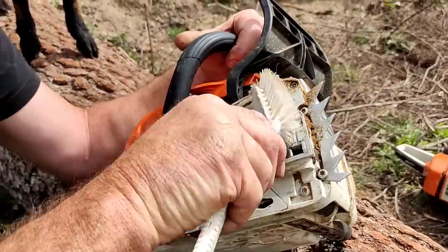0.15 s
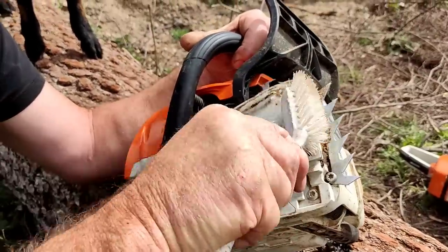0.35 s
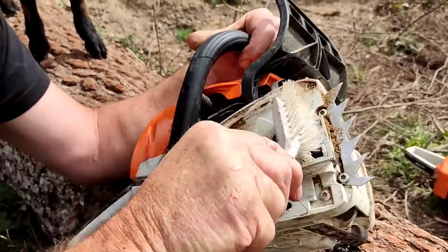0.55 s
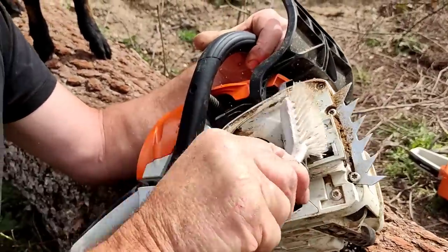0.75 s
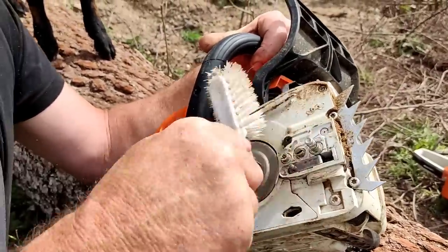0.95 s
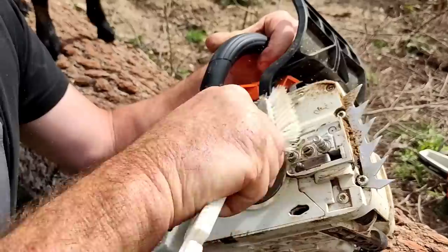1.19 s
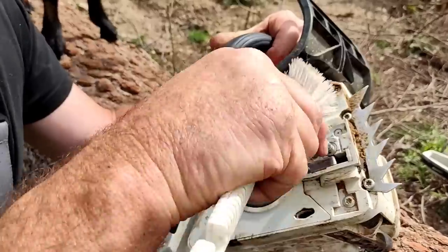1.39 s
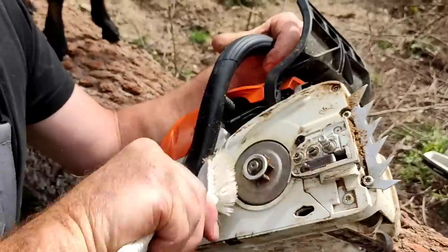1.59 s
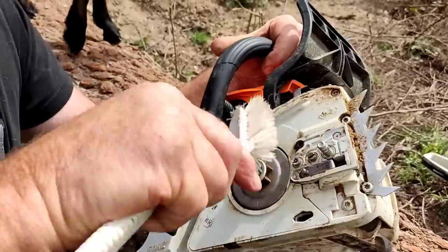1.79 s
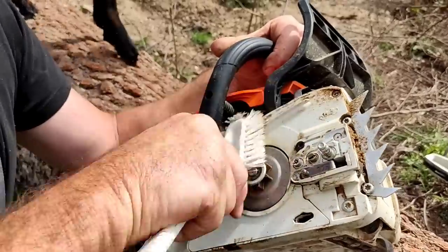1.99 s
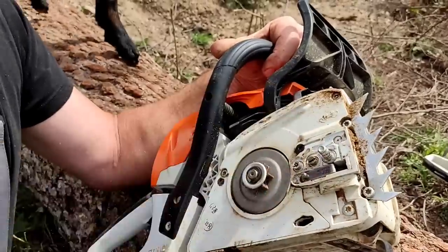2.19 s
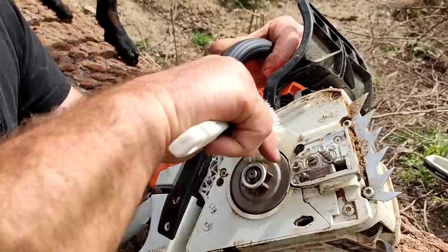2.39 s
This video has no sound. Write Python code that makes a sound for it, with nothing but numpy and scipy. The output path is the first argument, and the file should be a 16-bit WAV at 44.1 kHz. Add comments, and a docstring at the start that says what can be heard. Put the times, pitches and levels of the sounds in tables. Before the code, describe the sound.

Brisk scratchy brushing on a chainsaw: an early metallic tink, denser scrubbing towards one second, a sharp clack after a pause, then more separate strokes; recorded close in stereo outdoors with soft wind buffeting.

```python
"""Outdoors, close to a phone: a stiff brush scrubs a chainsaw.
Dense noisy ticks make the bristle hiss, coarser ticks the rumble of the hollow housing.
Noise bursts are the brush head's knocks; decaying sines are thuds and the ringing clutch drum.
Filtered noise buffets the two microphones as light wind; a faint wavering hum joins midway."""
import sys
import numpy as np
from scipy import signal
from scipy.fft import rfft, irfft
from scipy.io import wavfile
from scipy.ndimage import uniform_filter1d

SR = 44100
rng = np.random.default_rng(int(sys.argv[2]) if len(sys.argv) > 2 else 0)


def convert_level_to_amplitude(level_db):
    """Map a level in decibels to its linear amplitude factor."""
    exponent = np.asarray(level_db, float) / 20
    return 10 ** exponent


def transcribe(signal):
    """Save signal, clipped to [-1, 1], as a 16-bit WAV file at the path in sys.argv[1]."""
    frames = np.atleast_2d(signal).T
    limited = np.clip(frames, -1, 1)
    pcm = np.round(limited * 32767).astype(np.int16)
    wavfile.write(sys.argv[1], SR, pcm)


N = 108045


def curve(table, column):
    """One column of a time table, interpolated at every sample."""
    points = np.array(table, float)
    return np.interp(np.arange(N) / SR, points[:, 0], points[:, column])


def colour(x, table, unit=True):
    """Filter by (frequency [Hz], gain [dB]) points on a log frequency axis; rms 1 if unit."""
    points = np.array(table, float)
    hz = np.arange(N // 2 + 1) * SR / N + 1
    gain_db = np.interp(np.log(hz), np.log(points[:, 0]), points[:, 1])
    y = irfft(rfft(x) * convert_level_to_amplitude(gain_db), N)
    return y / np.sqrt(np.mean(y ** 2)) if unit else y


# stereo width: (frequency [Hz], side minus mid [dB])
WIDTH = [(60, 7), (110, -14), (200, -39), (380, -9.5), (700, -6), (1290, -6.5), (2380, -7), (4400, 1.5),
         (8120, 0), (15000, 2)]


def spread(mid, side):
    """Left and right from a mid and an unrelated side signal."""
    side = colour(side, WIDTH, unit=False)
    return np.array([mid + side, mid - side])


def pan(db):
    """Left and right gains, db apart."""
    return convert_level_to_amplitude(np.array([db, -db]) / 2)


# clutch drum mode frequencies [Hz]: RIM_MODES of the rim, one long-ringing, the rest hub and sprocket
DRUM_HZ = [1056, 2606, 2808, 5410, 8119, 11758, 4926, 7644, 8648, 9322, 10140, 11050, 12650]
# the same modes: (level [dB], t60 [s])
DRUM_MODES = [(-12, 0.29), (-36.5, 1.72), (-33, 2.3), (-18.5, 0.27), (-13, .55), (-11, 0.21), (-14.5, 0.71),
              (-11.5, 0.15), (-12, 0.2), (-18, 0.21), (-10, 0.1), (-8, 0.06), (-18, 0.077)]
# strikes: (time [s], rim [dB], hub [dB], favoured frequency [Hz], low modes [dB], long mode [dB],
# pan left minus right [dB]); negative time = already ringing
STRIKES = [(-.1, -25, -40, 4540, -30, -27, 0.5), (0.173, -44, -42, 10140, -60, -60, 15.5),
           (0.226, -16, -15.5, 12060, -25.5, -18.5, 5), (0.619, -10.5, -25.5, 10500, -13.5, -24.5, 0.5),
           (1.039, -46, -31.5, 8550, -28.5, -46, -12), (1.342, -39, -33.5, 8900, -33.5, -47, -12),
           (1.556, -50, -40, 10140, -50, -60, 13), (1.573, -22.5, -21.5, 8670, -18.5, -44, -7),
           (1.922, -36, -37, 7600, -48.5, -60, -8), (1.942, -20.5, -26.5, 10140, -32.5, -46, 1.5),
           (2.373, -38, -28, 10520, -31.5, -40.5, -0.5)]
RIM_MODES, LOW_BELOW_HZ, LONGEST_T60_S = 6, 1500, 1.4
FAVOUR_DB, FAVOUR_SIGMA_OCT = 14, 0.082
DRUM_LAG_RAD, DRUM_RISE_CYCLES = 1.675, 5


def strike_gain_db(strike, mode, hz, t60_s):
    """A strike drives each mode group at its own level, most the modes its spot favours."""
    time_s, rim_db, hub_db, spot_hz, low_db, long_db, _ = strike
    if hz < LOW_BELOW_HZ:
        gain_db = low_db
    elif mode < RIM_MODES:
        gain_db = rim_db
    else:
        gain_db = long_db if mode == RIM_MODES else hub_db
    gain_db += FAVOUR_DB * np.exp(-0.5 * (np.log2(hz / spot_hz) / FAVOUR_SIGMA_OCT) ** 2)
    return gain_db + 60 * min(time_s, 0) / t60_s  # decay before the start


def drum():
    """Strikes push damped complex resonators, one per mode of the steel drum."""
    out = np.zeros((2, N))
    phases = rng.random((len(STRIKES), len(DRUM_MODES)))
    for mode, (hz, (mode_db, t60_s)) in enumerate(zip(DRUM_HZ, DRUM_MODES)):
        t60_s = min(t60_s, LONGEST_T60_S)
        push = np.zeros((2, N), complex)
        for strike, phase in zip(STRIKES, phases[:, mode]):
            gain = convert_level_to_amplitude(strike_gain_db(strike, mode, hz, t60_s)) * pan(strike[-1])
            push[:, int(max(strike[0], 0) * SR)] += gain * np.exp(2j * np.pi * phase)
        turn = np.exp(2j * np.pi * hz / SR)
        decay = np.exp(-np.log(1000) / (t60_s * SR))
        ring = signal.lfilter([convert_level_to_amplitude(mode_db)], [1, -decay * turn], push)
        keep = np.exp(-hz / (DRUM_RISE_CYCLES * SR))  # swell over a few cycles
        ring = signal.lfilter([1 - keep], [1, -keep * turn], ring)
        lag_rad = DRUM_LAG_RAD * np.array([[0], [min(hz / LOW_BELOW_HZ, 1)]])  # right against left
        out += np.imag(ring * np.exp(1j * lag_rad))
    return out


LOUDEST_GRAIN_SPREADS = 3.38


def grains(rate_per_s, spread_db, tail_s):
    """Two trains of random ticks with common times and sizes, each tick a short noisy tail."""
    loudness = np.minimum(rng.exponential(size=N), LOUDEST_GRAIN_SPREADS)
    size = (rng.random(N) < rate_per_s / SR) * convert_level_to_amplitude(spread_db * loudness)
    power = signal.lfilter([1], [1, -np.exp(-2 / (tail_s * SR))], size ** 2)
    return np.sqrt(power) * rng.standard_normal((2, N))


PATCHY_DB, PATCHES_PER_S = 5, 30  # dB per unit of the smoothed random walk


def patchy(x, lo_hz, hi_hz):
    """Third-octave bands flicker separately as different bristles catch; end bands take the rest."""
    third_octave = 3 * np.log2(np.arange(N // 2 + 1) * SR / N + 1)
    first, last = int(3 * np.log2(lo_hz)), int(3 * np.log2(hi_hz))
    hold = int(SR / PATCHES_PER_S)
    spectrum, out = rfft(x), 0
    for centre in range(first, last + 1):
        steps = np.repeat(rng.standard_normal(size=400), hold)
        walk = uniform_filter1d(np.resize(steps, N), hold)
        weight = np.maximum(1 - abs(np.clip(third_octave, first, last) - centre), 0)
        out = out + convert_level_to_amplitude(PATCHY_DB * walk) * irfft(spectrum * weight, N)
    return out


# scrubbing strokes: (time [s], bristle hiss [dB], housing [dB])
SCRUB = [(0, -59.5, -33.5), (0.04, -69, -53.5), (0.1, -62, -56), (0.135, -57, -66), (0.215, -60, -61.5),
         (0.24, -36.5, -42.5), (0.3, -53.5, -64), (0.34, -40, -45), (0.38, -38, -51), (0.4, -48, -49),
         (0.44, -40, -45.5), (0.472, -45.5, -63), (0.5, -46, -40), (0.55, -36, -54.5), (0.575, -41, -60),
         (0.595, -53.5, -59.5), (0.63, -34, -47.5), (0.675, -48.5, -59), (0.72, -33.5, -43),
         (0.75, -27.5, -43.5), (0.775, -45.5, -53.5), (0.825, -36.5, -42.5), (0.87, -45.5, -61),
         (0.93, -32, -32.5), (0.975, -26.5, -40.5), (1.0, -23.5, -38), (1.05, -38.5, -43.5),
         (1.1, -51.5, -56.5), (1.234, -63.5, -60), (1.241, -39, -52.5), (1.31, -30, -39),
         (1.345, -36.5, -42), (1.375, -50.5, -63), (1.44, -53, -62), (1.462, -37.5, -55),
         (1.55, -50, -64.5), (1.62, -29, -40.5), (1.72, -32.5, -38), (1.78, -35.5, -41.5), (1.82, -51, -52),
         (1.9, -54, -56), (1.945, -45, -58), (2.04, -52, -70), (2.065, -34, -41), (2.13, -31.5, -43),
         (2.195, -33, -36), (2.21, -46, -37.5), (2.3, -60.5, -52.5), (2.355, -47, -49), (2.385, -51, -68),
         (2.45, -46, -104)]
# spectra of bristle hiss, housing rumble, mid scratches: (frequency [Hz], density [dB per Hz])
BRISTLE = [(3000, -14), (4430, -7), (5500, -4), (6250, 2.5), (6800, -3), (8100, 5), (9500, -1.5),
           (10400, 6.5), (11300, 0), (14200, -10.5), (16000, -37)]
HOUSING = [(150, -25.5), (410, -16.5), (520, -3.5), (690, -6.5), (840, 3), (1000, 4), (1200, -3.5),
           (1400, -0.5), (1550, -11.5), (2200, -45)]
MIDS = [(900, -14.5), (1400, 0), (2500, 5), (4000, -2.5), (4600, -20)]
# hiss balance: (frequency [Hz], left up and right down by [dB])
HISS_PAN = [(4500, -2), (13000, 4.5)]
MID_FOLLOWS_HISS, MID_DB = 0.6, -6.5  # share; the rest follows the housing


def scrub():
    """Bristle snaps in the treble, scratches in the middle, coarser bumps in the housing."""
    snaps = grains(rate_per_s=2600, spread_db=2.1, tail_s=0.002)
    bumps = grains(rate_per_s=460, spread_db=5, tail_s=0.014)
    scratches = grains(rate_per_s=550, spread_db=3.3, tail_s=0.003)
    hiss_db, housing_db = curve(SCRUB, 1), curve(SCRUB, 2)
    mid_db = MID_DB + MID_FOLLOWS_HISS * hiss_db + (1 - MID_FOLLOWS_HISS) * housing_db
    left, right = spread(*(colour(g, BRISTLE) for g in snaps)) * convert_level_to_amplitude(hiss_db)
    left = colour(left, HISS_PAN, unit=False)
    right = colour(right, np.array(HISS_PAN) * [1, -1], unit=False)
    hiss = np.array([left, right])
    body = spread(*(colour(g, HOUSING) for g in bumps)) * convert_level_to_amplitude(housing_db)
    mids = spread(*(colour(g, MIDS) for g in scratches)) * convert_level_to_amplitude(mid_db)
    return patchy(hiss + mids, lo_hz=1500, hi_hz=13000) + body


# wind gusts: (time [s], level before WIND_LIFT_DB [dB])
WIND = [(0, -56.5), (.08, -48), (.12, -54), (.19, -43), (.23, -64), (.38, -48), (.42, -48.5), (.48, -37),
        (.56, -59), (.615, -46.5), (.67, -59.5), (.74, -47), (.85, -57.5), (1.0, -66), (1.24, -52.5),
        (1.74, -55.5), (1.82, -53), (1.87, -43), (1.95, -54), (2.36, -56.5), (2.42, -47.5), (2.45, -54.5)]
# spectra of wind and outdoor hiss: (frequency [Hz], density [dB per Hz])
WIND_COLOUR = [(10, -70), (15, 3.5), (59, -1.5), (94, -7), (230, -25.5), (450, -33.5), (900, -82)]
AIR = [(150, 4), (300, -8.5), (1400, -9), (1700, -5), (4500, -56), (10500, -30), (14500, -53)]
WIND_LIFT_DB, WIND_PAN_DB, AIR_MID_RMS_DB = 8.5, 3.3, -66.5


def wind():
    """Low buffeting noise, unrelated at the two microphones, over a faint outdoor hiss."""
    gusts = np.array([colour(rng.standard_normal(N), WIND_COLOUR) for _ in range(2)])
    gusts *= convert_level_to_amplitude(curve(WIND, 1) + WIND_LIFT_DB) * pan(WIND_PAN_DB)[:, None]
    air = spread(*(colour(rng.standard_normal(N), AIR) for _ in range(2)))
    return gusts + convert_level_to_amplitude(AIR_MID_RMS_DB) * air


# dry knocks of the brush head: (time [s], peak before pan [dB], centre [Hz], pan left minus right [dB])
KNOCKS = [(.115, -35, 9300, 1), (0.226, -15, 11200, -10), (0.4832, -10.5, 11500, 12),
          (0.955, -12.5, 6900, -14), (0.9881, -7.5, 10000, 1.5), (1.2408, -20, 8350, -6),
          (1.2566, -22, 8000, -17), (1.326, -15, 7900, 13), (1.3302, -7, 7300, 8),
          (1.3424, -6, 8000, -12.5), (1.4527, -28, 11000, 5), (1.458, -21, 7840, 10),
          (1.511, -13.5, 9500, 6), (1.538, -28, 5740, 5), (1.651, -10.5, 5770, 1), (1.8444, -20.5, 9150, 8),
          (1.9439, -19.5, 9100, 14), (2.082, -18.5, 9760, 12), (2.0882, -16.5, 9300, 3),
          (2.0973, -9.5, 6600, -4), (2.336, -23.5, 7850, -5)]
KNOCK_SIGMA_OCT, KNOCK_SKIRT_DB, KNOCK_SIDE = 0.35, -18.5, 0.6
KNOCK_RISE_S, KNOCK_HOLD_S, KNOCK_T60_S = 0.00027, 0.0012, 0.014


def knocks():
    """Edge knocks: short bursts of dense damped ringing around a centre pitch, with a broad skirt."""
    size = 4096
    out = np.zeros((2, N + size))
    t = np.arange(size) / SR
    hz = np.arange(size // 2 + 1) * SR / size + 1
    decay = np.exp(-np.log(1000) * np.maximum(t - KNOCK_HOLD_S, 0) / KNOCK_T60_S)
    env = decay * np.minimum(t / KNOCK_RISE_S, 1)
    for time_s, peak_db, centre_hz, pan_db in KNOCKS:
        shape = np.exp(-0.5 * (np.log2(hz / centre_hz) / KNOCK_SIGMA_OCT) ** 2)
        shape += convert_level_to_amplitude(KNOCK_SKIRT_DB) * hz / (hz + 1500)
        mid, side = irfft(rfft(rng.standard_normal((2, size))) * shape, size)
        burst = (mid + KNOCK_SIDE * side * np.array([[1], [-1]])) * env
        burst /= np.abs(burst).max(axis=1, keepdims=True)
        start = int(time_s * SR)
        out[:, start:start + size] += convert_level_to_amplitude(peak_db) * pan(pan_db)[:, None] * burst
    return out[:, :N]


# hollow modes of the housing: (centre frequency [Hz], level [dB], t60 [s])
SHELL = [(511, -6, 0.11), (570, -0.5, 0.059), (828.5, -1.5, 0.063), (919, 5, 0.018), (1392, -8, 0.013)]
# thuds: (time [s], level before mode level and THUD_DB [dB], lift of modes under SHELL_LOW_HZ [dB])
THUDS = [(0.334, -38.5, -25), (0.35, -36, -22), (0.378, -37, -12), (0.414, -33, -15), (0.51, -32, -25),
         (0.532, -36.5, -3), (0.573, -39, -16), (0.647, -28.5, 2.5), (0.74, -22, -14.5), (0.792, -37, -9),
         (0.836, -31, -12), (0.942, -31, -2.5), (0.991, -32, 3.5), (1.306, -31, -4), (1.604, -28.5, -28),
         (1.651, -22.5, -12.5), (1.692, -25, -6), (1.719, -31, -30), (1.954, -43.5, 0), (2.092, -29, -2.5),
         (2.185, -25, -13.5), (2.364, -36, -7.5)]
SHELL_LOW_HZ, THUD_PUSH_S, THUD_DB, DETUNE_SPAN = 700, 0.0016, -5, 0.075


def thuds():
    """The brush head bumps the housing with a short push; its hollow modes ring briefly."""
    size = 8192
    out, t = np.zeros(N + size), np.arange(size) / SR
    draws = rng.random((len(THUDS), len(SHELL), 2))
    for (time_s, thud_db, low_db), draw in zip(THUDS, draws):
        start = int(time_s * SR)
        for (hz, mode_db, t60_s), (detune, phase) in zip(SHELL, draw):
            env = (1 - np.exp(-t / THUD_PUSH_S)) * np.exp(-np.log(1000) * t / t60_s)
            mode_hz = hz * (1 + DETUNE_SPAN * (detune - 0.5))
            ring = np.sin(2 * np.pi * (mode_hz * t + phase)) * env / env.max()
            gain_db = thud_db + mode_db + THUD_DB + low_db * (hz < SHELL_LOW_HZ)
            out[start:start + size] += convert_level_to_amplitude(gain_db) * ring
    return out[:N]


# faint hum: (start [s], end [s], frequency [Hz], level [dB], waver width [Hz])
HUM = 0.7, 1.56, 1017, -55.5, 9.5


def hum():
    """A faint sine near 1 kHz, its level and phase wavering with smoothed noise."""
    start_s, end_s, hz, db, width_hz = HUM
    t, smooth = np.arange(N) / SR, int(SR / width_hz)
    waver = uniform_filter1d(rng.standard_normal(N), smooth) * np.sqrt(smooth) * 0.5
    gate = np.clip(np.minimum(t - start_s, end_s - t) / 0.02, 0, 1)  # 20 ms fades
    return convert_level_to_amplitude(db) * gate * (1 + 0.5 * waver) * np.sin(2 * np.pi * hz * t + waver)


def scene():
    """Drum, brush, wind, knocks, thuds and hum."""
    return drum() + scrub() + wind() + knocks() + thuds() + hum()


def roll_off(x):
    """The treble ends steeply here."""
    return signal.sosfilt(signal.butter(12, 16430, fs=SR, output="sos"), x)


# phone response: (frequency [Hz], gain [dB])
MIC = [(14300, -1.5), (14800, -47), (16200, -40), (16600, -70)]


def record(dry):
    """The phone loses the top of the spectrum."""
    mix = np.array([colour(channel, MIC, unit=False) for channel in dry])
    return roll_off(mix)


dry = scene()
out = record(dry)
transcribe(out)
```